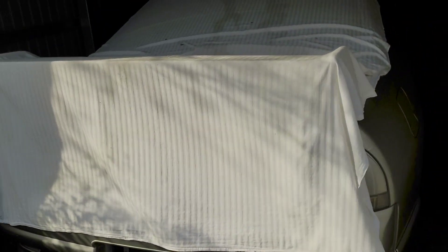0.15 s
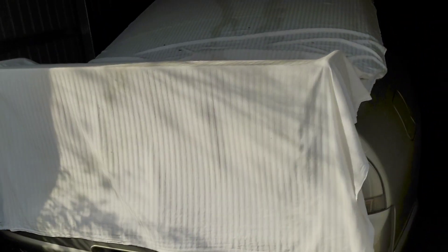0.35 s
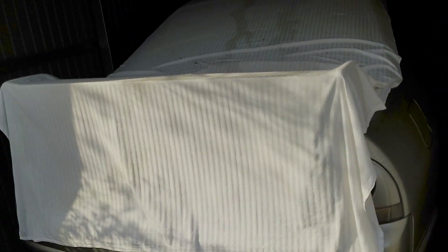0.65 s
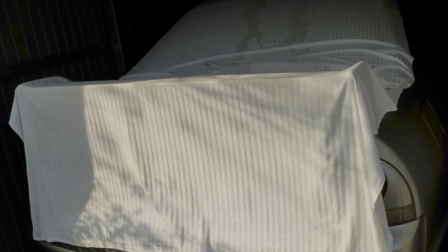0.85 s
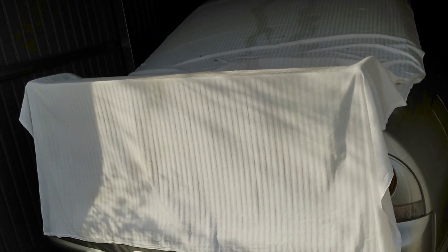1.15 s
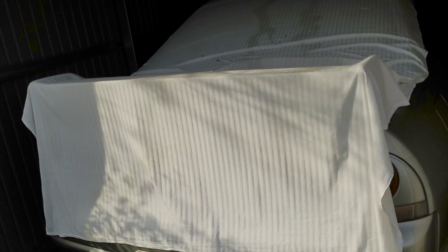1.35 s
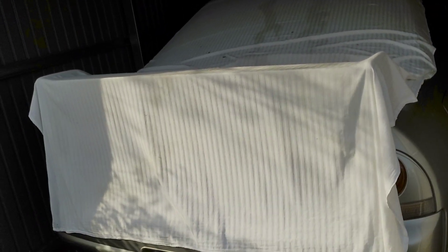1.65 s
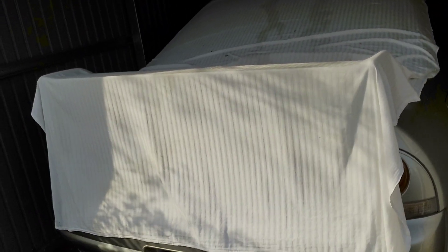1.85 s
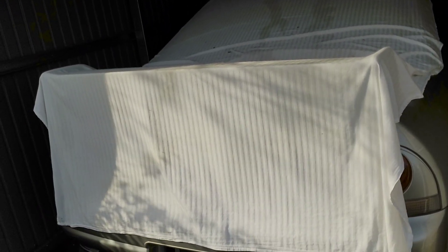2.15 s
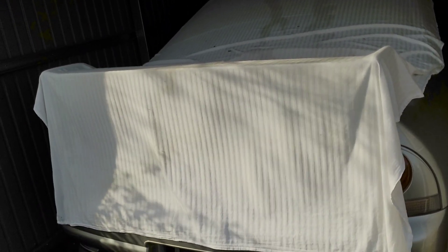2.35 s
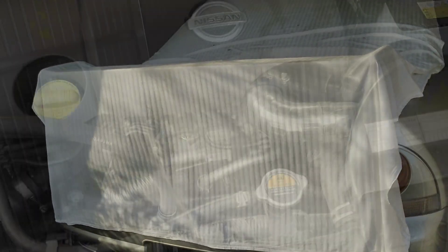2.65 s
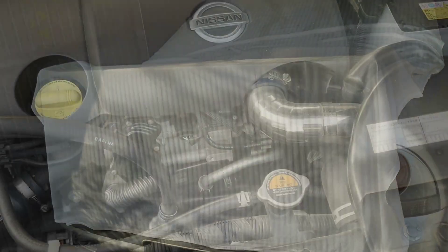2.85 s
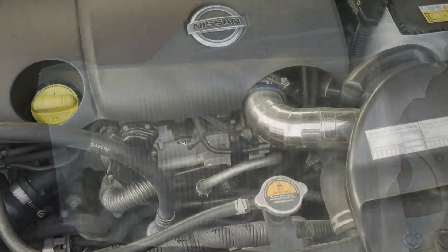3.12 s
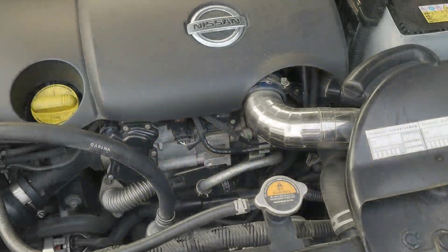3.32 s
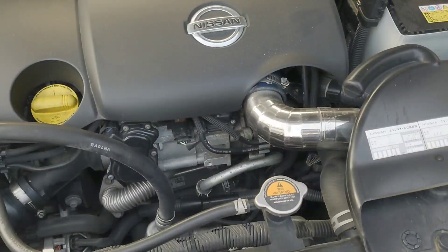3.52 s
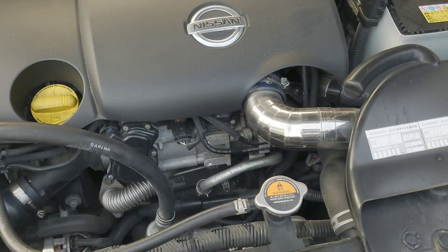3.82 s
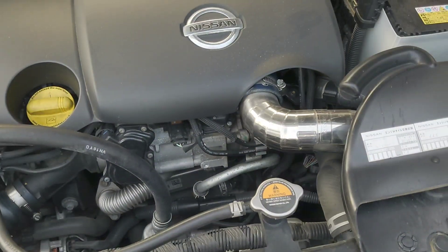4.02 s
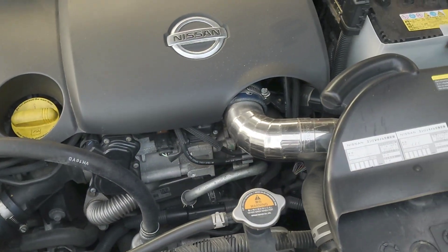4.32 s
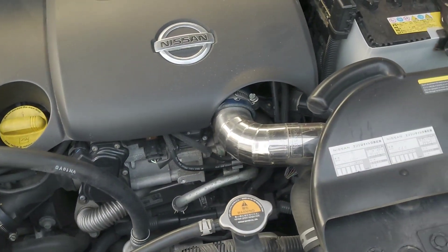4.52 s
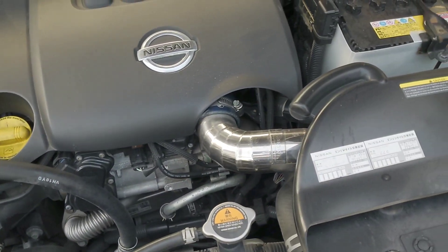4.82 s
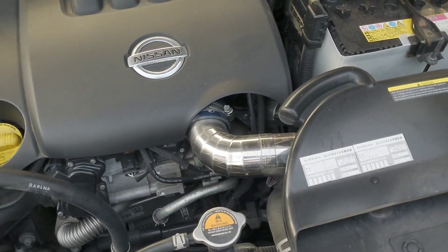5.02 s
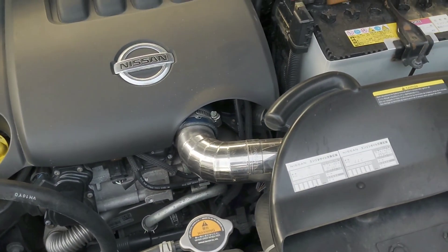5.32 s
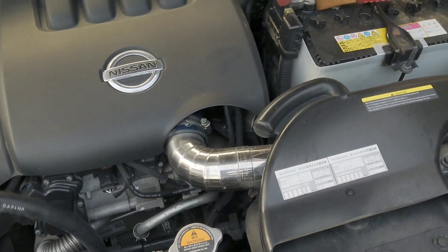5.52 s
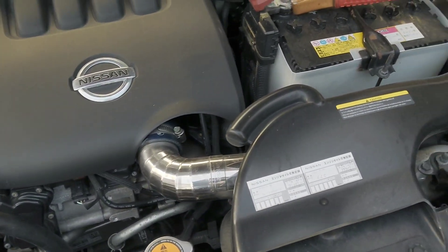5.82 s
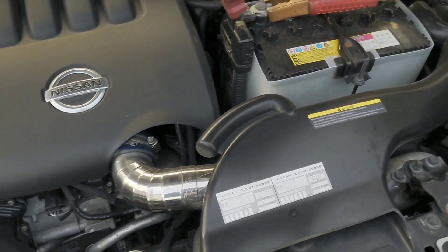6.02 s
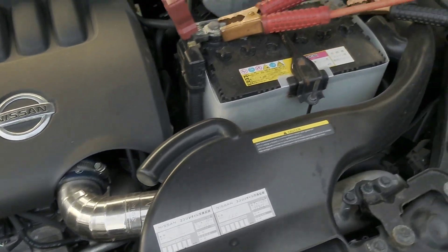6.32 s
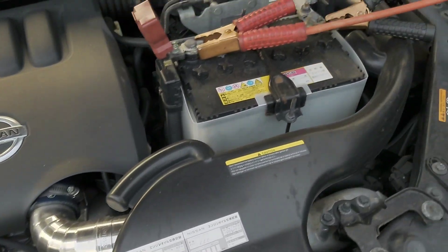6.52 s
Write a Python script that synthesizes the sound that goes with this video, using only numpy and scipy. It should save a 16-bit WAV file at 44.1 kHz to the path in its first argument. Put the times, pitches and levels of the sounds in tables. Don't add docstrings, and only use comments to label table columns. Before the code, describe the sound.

Outdoors, a four-cylinder diesel idles a few steps away under a cover, a steady low chug with dull knocking and light ticking. Wind gusts rumble and slap the stereo microphone, mostly on the left. After about half a second of silence, the same idle fades in quickly, close over the open bay, louder and clattery, with ringing covers and fan draught; the knock changes colour as the microphone moves sideways.

```python
import sys
import numpy as np
from scipy import signal
from scipy.fft import rfft, irfft, next_fast_len
from scipy.io import wavfile
from scipy.ndimage import uniform_filter1d

SR = 44100
rng = np.random.default_rng(int(sys.argv[2]) if len(sys.argv) > 2 else 0)


def store_pcm(level_fs):
    pcm = np.round(np.clip(level_fs, -1, 1) * 32767).astype(np.int16)
    wavfile.write(sys.argv[1], SR, np.atleast_2d(pcm).T)


def level_to_linear(level):
    exponent = np.asarray(level, float) / 20
    return 10 ** exponent


N = 294147
T = np.arange(N) / SR

FIRING_HZ = 25
TOP_HZ = 15750
FADE_DB, FADE_S = -18.5, 0.0639
BASS_HELD_DB, BASS_OPENS_S, BASS_OPENING_S = -14.5, 3.78, .008
BREEZE_DB, BREEZE_LEFT_DB, RUMBLE_DB, RUMBLE_LEFT_DB = -51, 8, -40, 0.78
SIDE_HIDES, FRONT_HZ = .55, 740

CUTS_S = (2.887, 3.504)
FAR_ENDS_S, NEAR_STARTS_S = CUTS_S

# time in seconds, start of the knock in ms after each 40 ms clock tick.
LAG = [(0, 21), (.6, 19), (2.9, 18.5), (3.5, 18.5), (4.4, 18), (4.9, 17.3), (6.7, 17.2)]
# knock in dB, injector in dB, valve closing delay in ms, valve in dB.
FAR_CYLINDERS = [(-3, 0.5, 31, -25), (-2, -2, 12.6, -7.5), (-1.5, -1, 14, -6.5), (-5, 4, 11, -2.5)]
NEAR_CYLINDERS = [(-.5, -4, 12, -9), (.5, 4, 7, -6), (-1, 0, 7, -6), (0, -2, 7, -5)]
# multiple of the firing rate, level in dB.
FAR_ORDERS = [(1, -13), (2, -1.5), (3, -2), (4, -12.5), (5, -26.5), (6, -15), (7, -15), (8, -14.5)]
NEAR_ORDERS = [(1, -15.5), (2, -1.5), (3, -5), (4, -12), (5, -12), (6, -15), (7, -11), (8, -12)]
# pitch in Hz, width in Hz, level in dB, nearest cylinder 0-3 (rounded; below
# 0 none), extra from that cylinder in dB.
FAR_PANELS = [(368.5, 45, -14, 1, 13), (527.7, 18, -4.5, 0.5, 3), (372, 45, -14, 3, 13),
              (730.3, 24.2, -4.5, 1, 2.5), (845.4, 37, -4, -2, 1.5), (981.1, 8.1, -3.5, 2.5, 1.5)]
NEAR_PANELS = [(375, 20, -6, 3, 1), (527, 15, -8, 1, 1), (662, 22, 2, 3, 4), (785, 16, -6, 2, 11),
               (873, 14, -8, 0, 10), (988, 36, -4.5, 3, 2), (1060, 30, -12, 1, 5), (1165, 25, -12, 1, 8)]
FAR_PANEL_MS = (26, 8.5, 26, 9, 8, 0)
NEAR_PANEL_MS = (1.5, 8, 6.5, 11, 6, -1, -1, -.5)
# frequency in Hz, level in dB per Hz.
FAR_BLOCK = [(130, -31), (220, -7), (274, -7.5), (376, -1), (430, -9), (520, -4.5), (620, -15), (718, -5),
             (784, -9), (848, -3.5), (925, -8), (1180, -7), (1450, -28.5), (1880, -45.5), (3190, -120)]
NEAR_BLOCK = [(130, -35), (220, -8.5), (311, -10.5), (376, -7), (444, -12.5), (524, -7.5), (660, -8),
              (724, -9), (830, -2.5), (925, -8), (1050, -1.5), (1230, -11), (1450, -20), (1880, -49),
              (3190, -120)]
SIDE_BLOCK = [(130, -41.5), (220, -12.5), (279, -7.5), (314, -9.5), (376, -7), (441, -10.5), (466, -7.5),
              (664, -2.5), (724, -12), (848, -4.5), (947, -19), (1100, -4), (1450, -11.5), (1880, -47.5),
              (3190, -120)]
FAR_KNOCK = [(760, -13.5), (1300, -1), (1550, -6.5), (1810, -5), (1970, -1.5), (2060, -2), (2280, -8.5),
             (2530, -8), (3200, -19), (4160, -43.5), (7040, -120)]
NEAR_KNOCK = [(760, -14.5), (1300, -3), (1530, -4.5), (1740, -6), (1920, -3.5), (2030, -6.5), (2200, -9.5),
              (2650, -8), (3020, -22), (3200, -23.5), (4160, -53.5), (7040, -120)]
SIDE_KNOCK = [(760, -29), (1300, -10), (1460, -7), (1710, -7), (1920, -4.5), (2120, -3.5), (2430, -9.5),
              (2670, -7.5), (2920, -15), (3200, -24), (4160, -51.5), (7040, -120)]
FAR_INJECTOR = [(1760, -31.5), (3000, -3.5), (3410, -2), (3690, 3.5), (4050, -3.5), (4870, -0.5),
                (5120, -9.5), (5420, -22), (5900, -26), (7670, -43.5), (13000, -120)]
NEAR_INJECTOR = [(1760, -8.5), (3000, -18), (3260, -4.5), (3700, 1.5), (4130, -4), (4880, -3.5), (5110, -8),
                 (5360, -13.5), (5900, -16), (7670, -41.5), (13000, -120)]
FAR_HISS = [(3240, -30.5), (5500, -3), (6410, -5.5), (7080, -4.5), (9000, -4.5), (12100, -2), (13800, 2.5),
            (15500, -5), (16000, -13), (16200, -33)]
NEAR_HISS = [(3240, -49), (5500, -0.5), (7680, -1.5), (8300, -1.5), (8920, -5), (10900, -0.5),
             (11900, -2.5), (14800, 0.5), (15700, -6), (16200, -18.5)]
# pitch in Hz, width in Hz, level in dB.
HEAD_TONES = [(1751, 250, -5.5), (1953.4, 180, 1), (2664, 67, -18.5)]
SIDE_HEAD_TONES = [(1750.6, 300, 9), (2096, 240, 2.5), (2780, 78, -17.5)]
NOZZLE_TONES = [(3666, 250.6, -4.5), (4889.7, 200, -0.5)]
FAR_RING_DB = (-5.5, -5, -9.5)
NEAR_RING_DB = (-.3, 0, -.8)
FAR_DB = (-40, -41, -47.5, -57.5, -70.5)
NEAR_DB = (-36, -32, -34.5, -45, -50.5)
FAR_FOLLOWS = (1.5, 0.24, 0.1, 2.5, -0.02)
NEAR_FOLLOWS = (0.048, 0.046, 1.013, 0.87, 0.314)
# time in seconds, nearness in dB.
APPROACH = [(0, -1), (1, 0.21), (2.2, 0), (2.9, -0.28)]
# time in seconds, nearness to the head in dB.
DRIFT = [(3.8, 0.22), (5.2, -0.15), (5.55, -2.5), (5.9, -3), (6.3, -4.5), (6.67, -2.5)]
# time in seconds, share of the knock heard from the side 0-1.
WALK = [(0, 0), (5.1, 0.07), (5.8, 0.73), (6.7, 1)]
# frequency in Hz, left over right in dB.
FAR_LEFT = [(60, 5.5), (110, 1), (200, -3), (380, 2), (700, 4), (1290, -2.5), (2380, -4), (4400, -0.5),
            (8120, -2), (15000, -1.5)]
NEAR_LEFT = [(60, 2.5), (110, 1.5), (200, 1.0), (380, 1.25), (700, 1.53), (1290, 1.54), (2380, 0.18),
             (4400, 4.47), (8120, 1.5), (15000, 2.57)]
# frequency in Hz, likeness 0-1.
FAR_ALIKE = [(200, 1), (640, 0.83), (1400, 0.38), (2500, 0.37), (5000, .15), (9000, .05)]
NEAR_ALIKE = [(200, 1), (640, 0.584), (1400, 0.406), (2500, 0.104), (5000, 0.046), (9000, .05)]
# frequency in Hz, lead of the left in radians.
FAR_LEAD = [(300, .2), (950, 1.2), (1550, 2.9), (2500, 6.3), (5000, 12)]
NEAR_LEAD = [(300, 0), (690, .2), (1640, 3.4), (2150, 5.9), (4000, 6.3)]
# time in seconds, peak in dB, pitch in Hz, half length in ms.
TICKS = [
    (.194, -31, 2850, 1),
    (3.535, -38, 890, 22),
]
# frequency in Hz, level in dB per Hz.
BUFFET = [(25, -29.5), (60, -2), (100, 0.5), (180, -2.5), (260, -11), (400, -22), (600, -60), (1200, -120)]
# time in seconds, peak in dB, left over right in dB, swell in
# seconds per 9 dB.
GUSTS = [(.54, -45, 16.5, 0.0739), (.66, -36, 5.5, 0.0762), (.78, -39, 10, .05), (.84, -35, -2.5, .05),
         (.91, -30, 4, .1), (1.085, -28.5, 7, 0.0835), (1.2, -39.5, 3, .1), (1.4, -39.5, 6.5, 0.0635),
         (1.51, -47, 22, 0.04), (1.7, -50, 18, 0.1), (1.98, -42, 12, 0.02), (2.1, -39.5, 15, 0.09),
         (2.16, -42.5, -8.5, 0.0061), (2.61, -41.5, -8, 0.08), (2.87, -46, -4, 0.25),
         (5.66, -34.5, -4, 0.14), (6.2, -41.5, -0.2, 0.32)]
# time in seconds, port (0 left, 1 right), peak in dB, pitch in Hz, length in cycles.
SLAPS = [(0.836, 1, -26.5, 220, 2.58), (0.9125, 1, -18, 100, 1.8), (1.0595, 0, -13, 327.6, 1.205),
         (1.062, 0, -8, 175, 1.076), (1.1, 0, -12.5, 129.5, 0.92), (1.278, 0, -22.5, 130, 1),
         (1.949, 0, -14.5, 170, 0.646)]


def unit(x):
    return x / np.sqrt(np.mean(x ** 2) + 1e-20)


def along(points, hz):
    f, v = np.transpose(points)
    return np.interp(np.log(hz + 1), np.log(f + 1), v)


def curves(rows):
    s, *columns = np.transpose(rows)
    return [np.interp(T, s, column) for column in columns]


def wobble(rate):
    knots = rng.standard_normal(int(N * rate / SR) + 2)
    return np.interp(T * rate, np.arange(len(knots)), knots)


def crank():
    return FIRING_HZ * (T - curves(LAG)[0] / 1000)


def strokes(levels_db, after_ms, scatter_db, jitter_ms):
    n = np.arange(-1, int(N / SR * FIRING_HZ) + 1)
    cylinder = n % 4
    chance = rng.standard_normal((len(n), 2))
    delay_ms = after_ms[cylinder] + jitter_ms * chance[:, 0]
    s = np.interp(n, crank(), T) + delay_ms / 1000
    index = np.clip(np.round(s * SR).astype(int), 1, N - 1)
    return np.bincount(index, level_to_linear(levels_db[cylinder] + scatter_db * chance[:, 1]), N)


def burst(hits, rise_ms, fall_ms, steady_db):
    ms = np.arange(SR // 8) * 1000 / SR
    shape = (1 - np.exp(-ms / rise_ms)) ** 2 * np.exp(-ms / fall_ms)
    power = np.abs(signal.fftconvolve(hits ** 2, (shape / shape.max()) ** 2)[:N])
    return np.sqrt(power + level_to_linear(2 * steady_db))


def spread(pair, colour, alike, left, lead, span):
    part = pair[:, span]
    m = next_fast_len(part.shape[1] + SR // 8)
    hz = np.fft.rfftfreq(m, 1 / SR)
    turn = np.arccos(np.clip(along(alike, hz), -1, 1)) / 2
    mid, side = rfft(part, m) * colour(hz) * [np.cos(turn), np.sin(turn)]
    tilt = level_to_linear(along(left, hz) / 2) * np.exp(.5j * along(lead, hz))
    sides = irfft([(mid + side) * tilt, (mid - side) / tilt], m)[:, :part.shape[1]]
    out = np.zeros((2, N))
    out[:, span] = unit(sides)
    return out


def rattle(envelope, spectrum, space):
    noise = rng.standard_normal((2, N)) * envelope
    return spread(noise, lambda hz: level_to_linear(along(spectrum, hz)), *space)


def struck(hits, modes, space, rise_ms, fall_ms):
    def tone(hz, width, db):
        level = level_to_linear(db + 0.98 * wobble(40))
        phase_drift = np.cumsum(wobble(250)) * width / SR * 2 * np.pi / 3
        return level * np.cos(2 * np.pi * hz * T + phase_drift)

    pair = [sum(tone(*mode) for mode in modes) for _ in range(2)]
    return spread(burst(hits, rise_ms, fall_ms, steady_db=-39.5) * pair, np.ones_like, *space)


def round_the_bay(front, beside, side):
    return np.sqrt(1 - side) * front + np.sqrt(side) * beside


def engine(levels, cylinders, pulse, modes, colours, space, steady_db, ring_db, left_db, side):
    exhaust_db, block_db, knock_db, injector_db, hiss_db = levels
    fire_db, tick_db, valve_ms, valve_db = np.transpose(cylinders)
    fire = strokes(fire_db, np.full(4, .3), scatter_db=1, jitter_ms=.5)
    valves = strokes(valve_db, .3 + valve_ms, scatter_db=1.5, jitter_ms=.8)
    ticks = strokes(tick_db, np.full(4, -1.5), scatter_db=1.8, jitter_ms=.4)
    out = level_to_linear(exhaust_db + np.array([[left_db], [-left_db]]) / 2) * pulse
    out = out + level_to_linear(block_db - 1.5) * block(fire, valves, modes, colours[0], space, steady_db[0], ring_db[0], side)
    out += level_to_linear(knock_db + 2.5) * knock(fire, valves, colours[1], space, steady_db[1], ring_db[1], side)
    out += level_to_linear(injector_db + 2.5) * injectors(ticks, fire, valves, colours[2], space, steady_db[2], ring_db[2], side)
    return out + level_to_linear(hiss_db + 4) * hiss(ticks, fire, colours[3], space, steady_db[3])


def exhaust(orders, after_ms, skew):
    angle = 2 * np.pi * (crank() - after_ms * FIRING_HZ / 1000)
    return unit(sum(level_to_linear(db + .8 * wobble(5)) * np.cos(k * angle - skew) for k, db in orders))


def block(fire, valves, modes, colour, space, steady_db, ring_db, side):
    thudding = burst(fire + valves, 4.4, 36, steady_db)
    out = rattle(thudding, colour, space)
    if side.any():
        out = round_the_bay(out, rattle(thudding, SIDE_BLOCK, space), side)
    return out + level_to_linear(ring_db) * panels(*modes, 1 - SIDE_HIDES * side)


def panels(modes, after_ms, in_view):
    alone_db = np.where(np.eye(4), 0, -120)
    blows = np.array([strokes(row, np.zeros(4), scatter_db=1, jitter_ms=.04) for row in alone_db])
    out = np.zeros(N)
    for k, ((hz, width, db, near, more_db), ms) in enumerate(zip(modes, after_ms)):
        strength = level_to_linear(db + more_db * (np.arange(4) == round(near)))
        felt = np.roll(strength @ blows, round(ms * SR / 1000))
        ring = signal.lfilter(*signal.iirpeak(hz, hz / width, SR), felt)
        sign = (-1) ** k
        out += sign * ring * (in_view if hz > FRONT_HZ else 1)
    return unit(out)


def knock(fire, valves, colour, space, steady_db, ring_db, side):
    knocking = burst(fire + .5 * valves, 2.8, 9.93, steady_db)
    ringing = struck(fire + valves, HEAD_TONES, space, rise_ms=1.8, fall_ms=3.1)
    out = rattle(knocking, colour, space) + level_to_linear(ring_db) * ringing
    if side.any():
        ringing = struck(fire + valves, SIDE_HEAD_TONES, space, rise_ms=1.82, fall_ms=5.4)
        beside = rattle(knocking, SIDE_KNOCK, space) + level_to_linear(ring_db) * ringing
        out = round_the_bay(out, beside, side)
    return out


def injectors(ticks, fire, valves, colour, space, steady_db, ring_db, side):
    hits = 0.2 * ticks + 0.891 * fire + 0.257 * valves
    out = rattle(burst(hits, 2.5, 7.2, steady_db), colour, space)
    ringing = struck(ticks, NOZZLE_TONES, space, rise_ms=0.89, fall_ms=6.25)
    return out + level_to_linear(ring_db) * (1 - SIDE_HIDES * side) * ringing


def hiss(ticks, fire, colour, space, steady_db):
    return rattle(burst(ticks ** .5 + .5 * fire, 2.8, 7, steady_db), colour, space)


def loudness(settled_db, follows, nearness):
    return np.array(settled_db)[:, None] + np.outer(follows, curves(nearness)[0])


def fade_db():
    since = np.clip(T - NEAR_STARTS_S, 0, None)
    return FADE_DB * np.exp(-since / FADE_S) * (T > FAR_ENDS_S)


def near_loudness():
    levels_db = loudness(NEAR_DB, NEAR_FOLLOWS, DRIFT) + fade_db()
    held = np.clip(.5 - (T - BASS_OPENS_S) / (4 * BASS_OPENING_S), 0, 1)
    levels_db[0] += BASS_HELD_DB * held
    return levels_db


def loose_parts():
    out = np.zeros(N)
    for s, db, hz, ms in TICKS:
        swell = np.exp(-((T - s) * 1000 / ms) ** 2)
        out += level_to_linear(db) * swell * np.sin(2 * np.pi * hz * T)
    return out


def wind():
    lumps = level_to_linear(1.9 * np.array([wobble(30), wobble(30), wobble(20)]))
    m = next_fast_len(N + SR // 4)
    colour = level_to_linear(along(BUFFET, np.fft.rfftfreq(m, 1 / SR)))
    noise = rng.standard_normal((3, N)) * lumps
    left, right, both = unit(irfft(rfft(noise, m) * colour, m)[..., :N])
    shared = np.where(T < FAR_ENDS_S, .15, .75)
    rumble = np.sqrt(1 - shared) * [left, right] + np.sqrt(shared) * both
    out = buffeting() * rumble
    for s, port, db, hz, cycles in SLAPS:
        u = (T - s) * hz
        out[round(port)] += level_to_linear(db) * np.exp(-(2 * u / cycles) ** 2) * np.cos(2 * np.pi * u + 1.5)
    return out


def buffeting():
    ports = np.array([[.5], [-.5]])
    far = T < FAR_ENDS_S
    steady_db = np.where(far, BREEZE_DB, RUMBLE_DB + fade_db())
    power = level_to_linear(2 * (steady_db + ports * np.where(far, BREEZE_LEFT_DB, RUMBLE_LEFT_DB)))
    for s, db, left_db, swell_s in GUSTS:
        power = power + level_to_linear(2 * (db + ports * left_db)) * np.exp(-2 * np.abs(T - s) / swell_s)
    return np.sqrt(power)


def scene():
    gap = round(np.mean(CUTS_S) * SR)
    far = engine(loudness(FAR_DB, FAR_FOLLOWS, APPROACH), FAR_CYLINDERS,
                 exhaust(FAR_ORDERS, after_ms=24.954, skew=.1), (FAR_PANELS, FAR_PANEL_MS),
                 (FAR_BLOCK, FAR_KNOCK, FAR_INJECTOR, FAR_HISS),
                 (FAR_ALIKE, FAR_LEFT, FAR_LEAD, slice(0, gap)),
                 steady_db=(0.5, -7.5, -6.5, 1.0), ring_db=FAR_RING_DB, left_db=4.5, side=np.zeros(N))
    near = engine(near_loudness(), NEAR_CYLINDERS,
                  exhaust(NEAR_ORDERS, after_ms=21.64, skew=1.3), (NEAR_PANELS, NEAR_PANEL_MS),
                  (NEAR_BLOCK, NEAR_KNOCK, NEAR_INJECTOR, NEAR_HISS),
                  (NEAR_ALIKE, NEAR_LEFT, NEAR_LEAD, slice(gap, N)),
                  steady_db=(5, -7.5, -11, -13), ring_db=NEAR_RING_DB, left_db=3.0,
                  side=np.clip(curves(WALK)[0], 0, 1))
    return np.where(T < FAR_ENDS_S, far, near) + wind() + loose_parts()


def starved(x, from_hz, keep_db, patchy_db):
    hz, _, z = signal.stft(x, SR, nperseg=1024)
    power = np.abs(z) ** 2
    field = uniform_filter1d(rng.standard_normal(z.shape[1:]), size=7, axis=0)
    field = uniform_filter1d(field, size=9, axis=1)
    bar = uniform_filter1d(power, size=41, axis=1) * level_to_linear(2 * (keep_db + patchy_db * unit(field)))
    keep = (power > bar) | (hz < from_hz)[:, None]
    return signal.istft(z * keep * (hz < TOP_HZ)[:, None], SR, nperseg=1024)[1][:, :N]


def band_limit(x):
    return signal.sosfilt(signal.butter(12, 16480, fs=SR, output="sos"), x)


def record(dry):
    far_open = np.clip((FAR_ENDS_S - T) / .002, 0, 1)
    near_open = np.clip((T - NEAR_STARTS_S) / .002, 0, 1)
    thin = starved(dry, from_hz=5850, keep_db=-2.5, patchy_db=5.5)
    return band_limit(thin * (far_open + near_open))


dry = scene()
out = record(dry)
store_pcm(out)
```